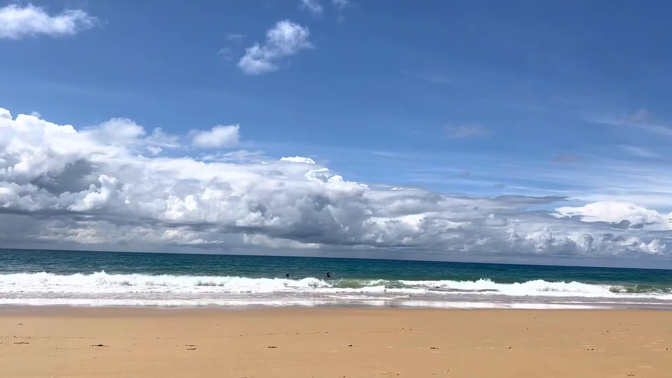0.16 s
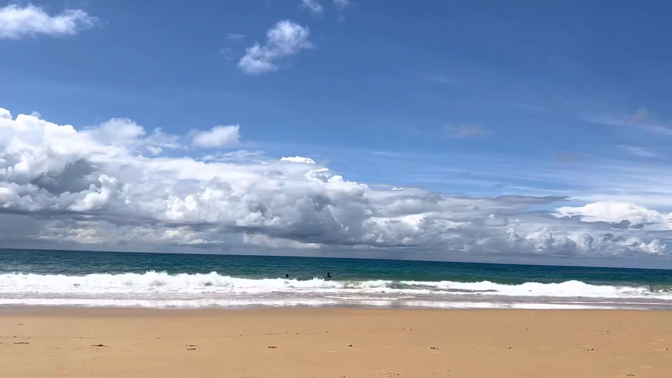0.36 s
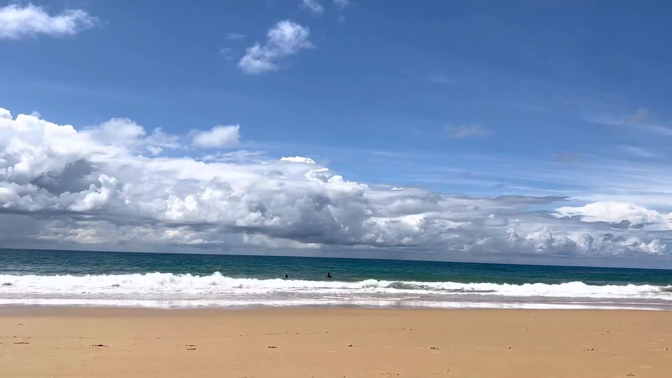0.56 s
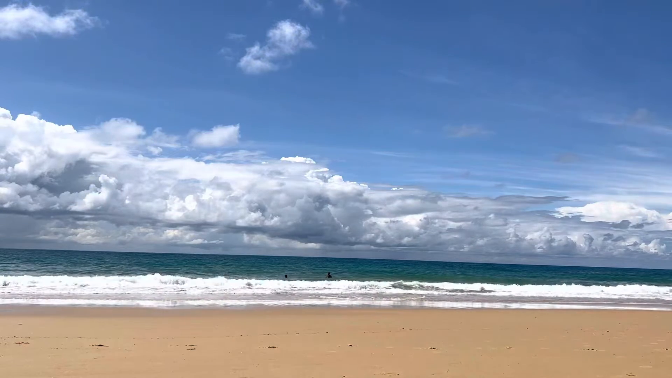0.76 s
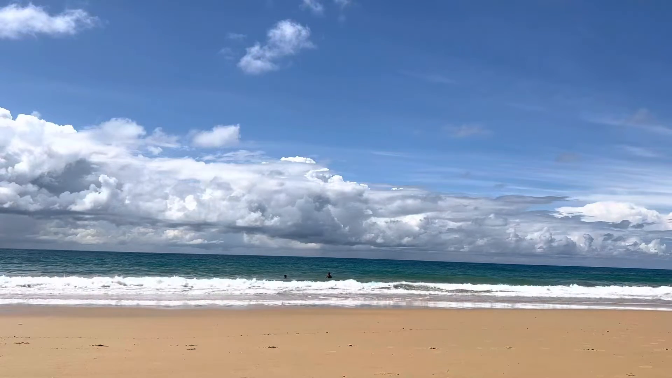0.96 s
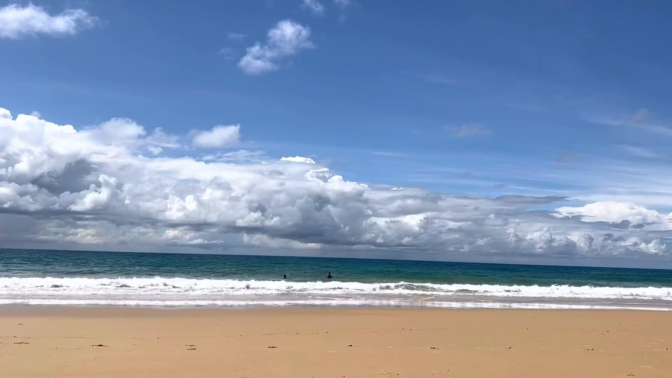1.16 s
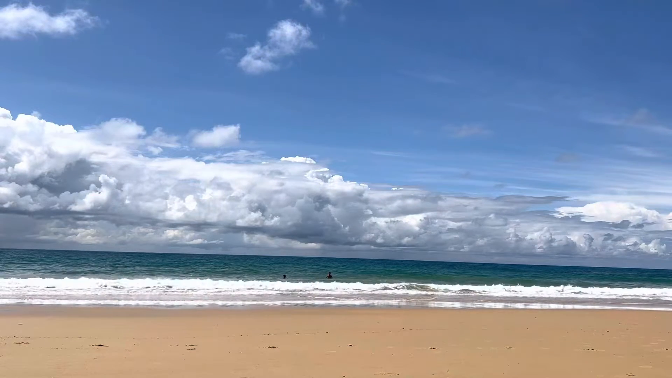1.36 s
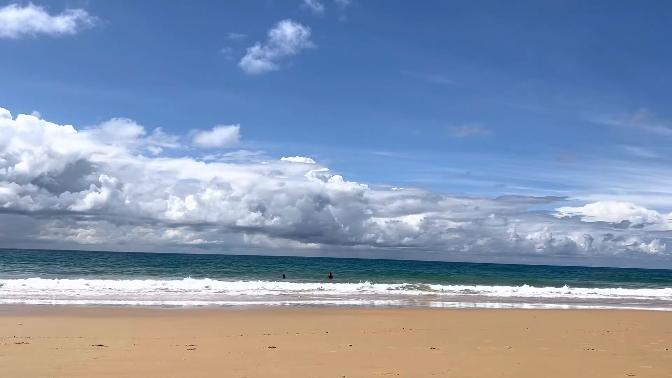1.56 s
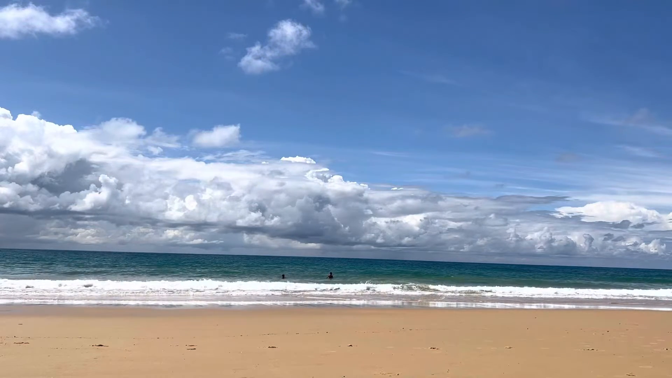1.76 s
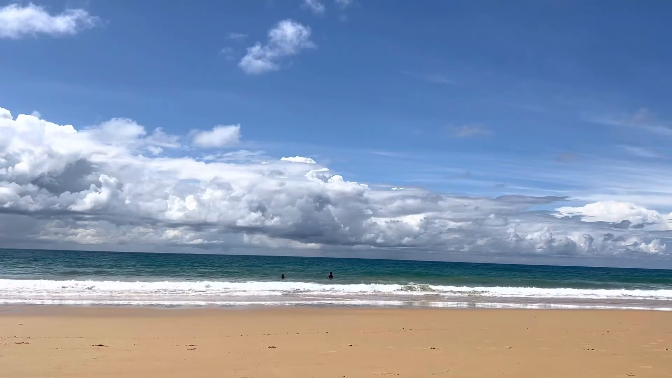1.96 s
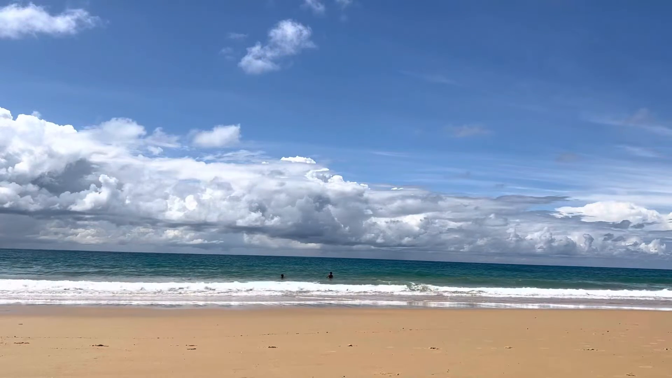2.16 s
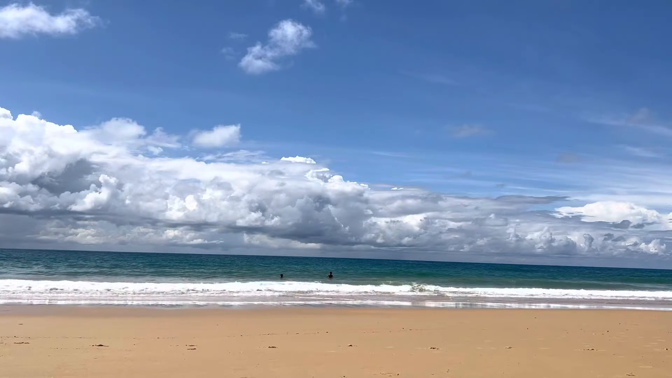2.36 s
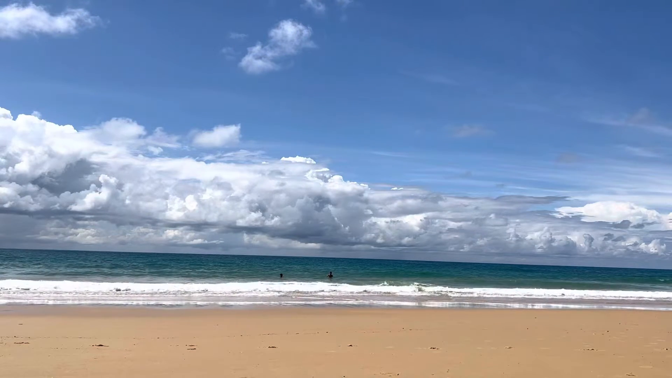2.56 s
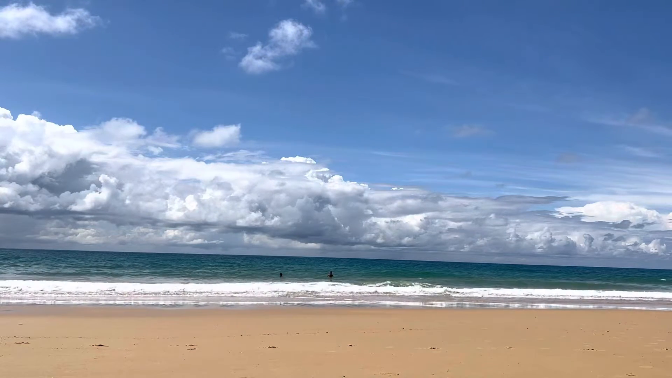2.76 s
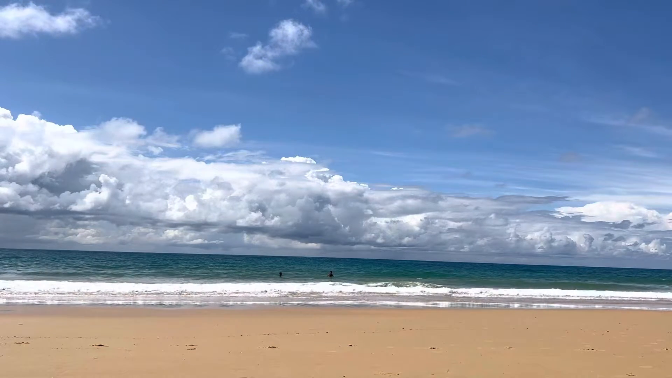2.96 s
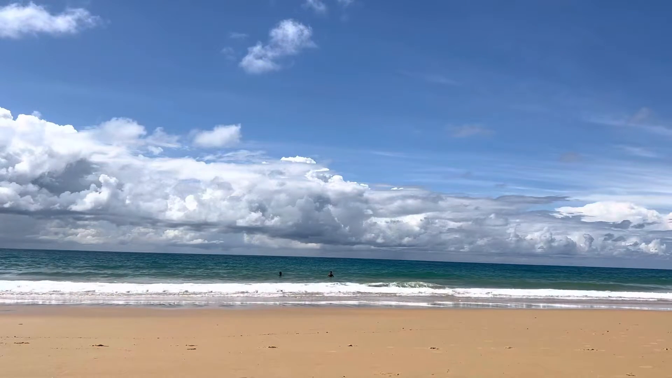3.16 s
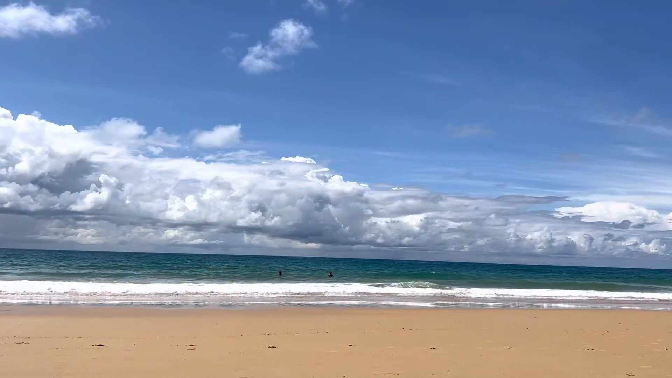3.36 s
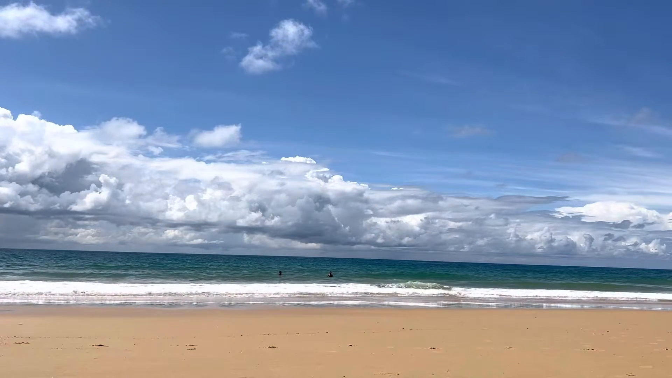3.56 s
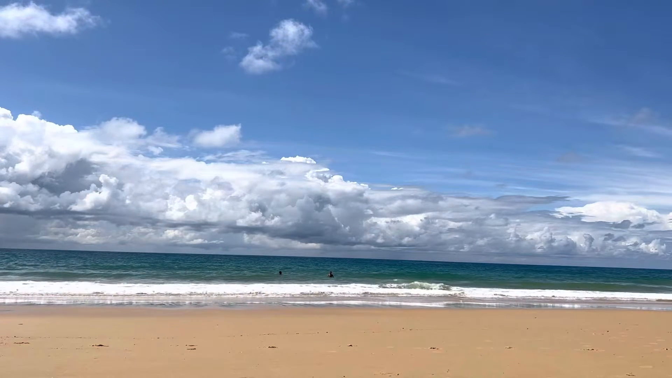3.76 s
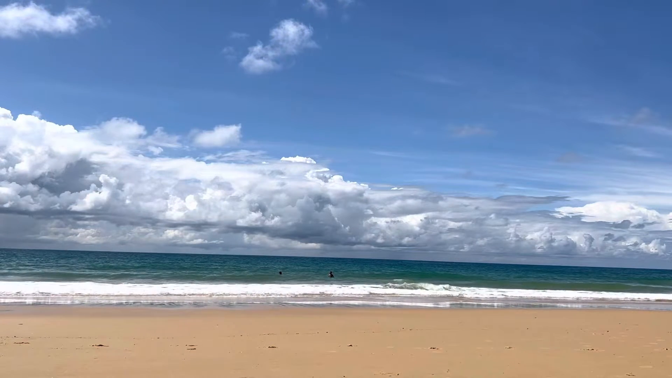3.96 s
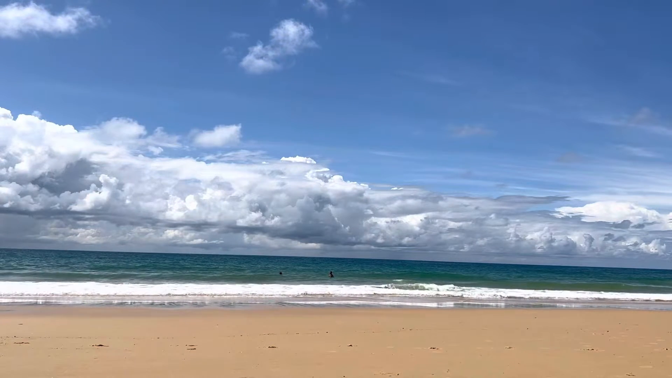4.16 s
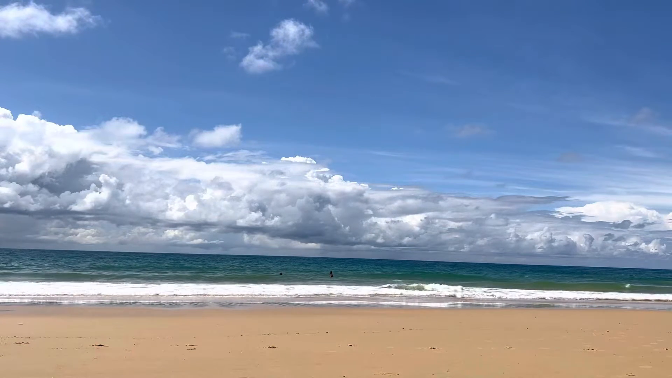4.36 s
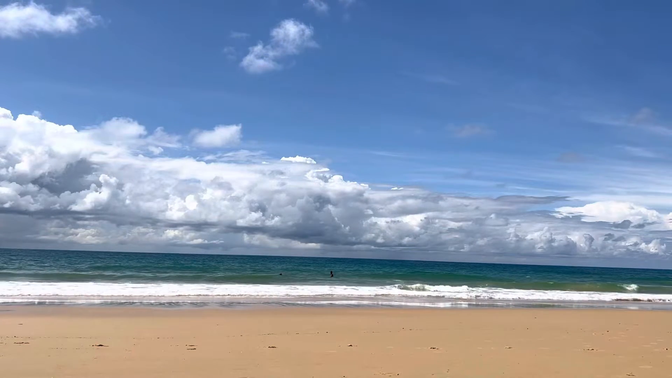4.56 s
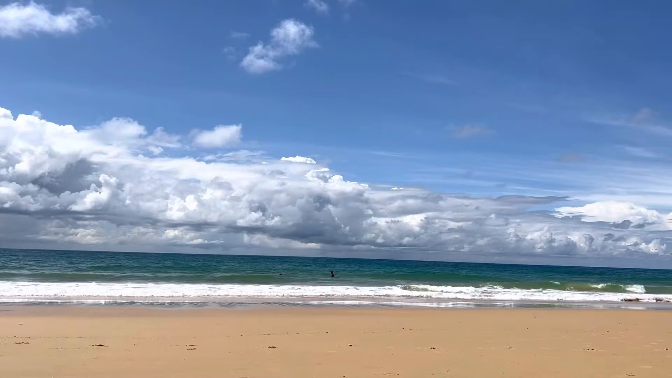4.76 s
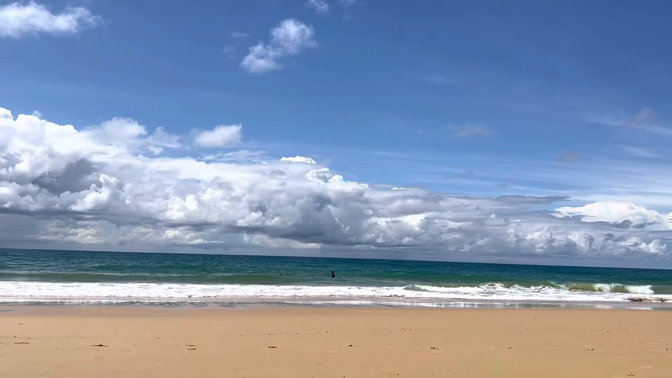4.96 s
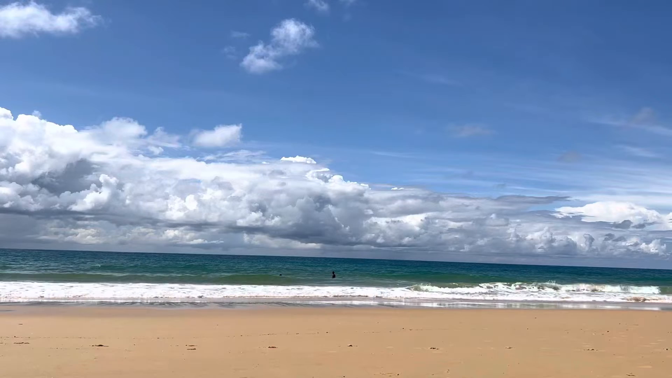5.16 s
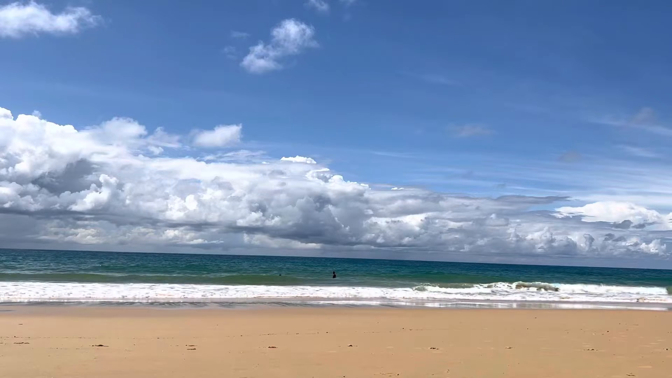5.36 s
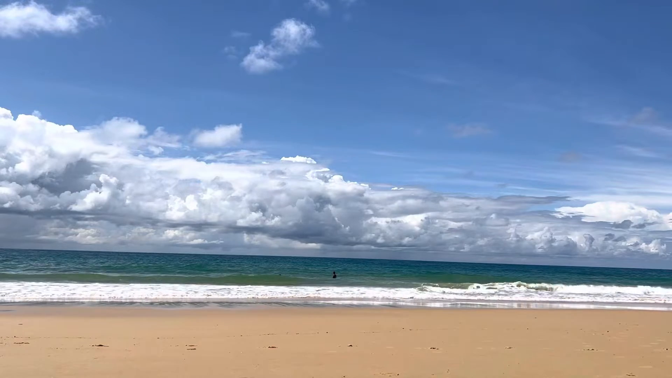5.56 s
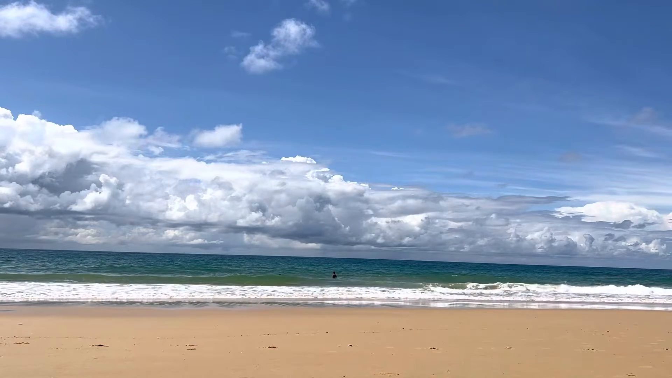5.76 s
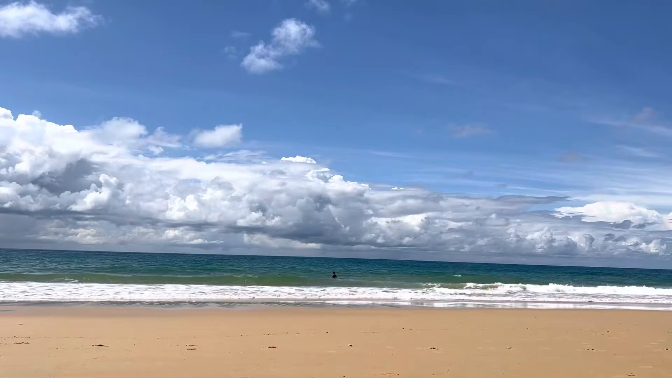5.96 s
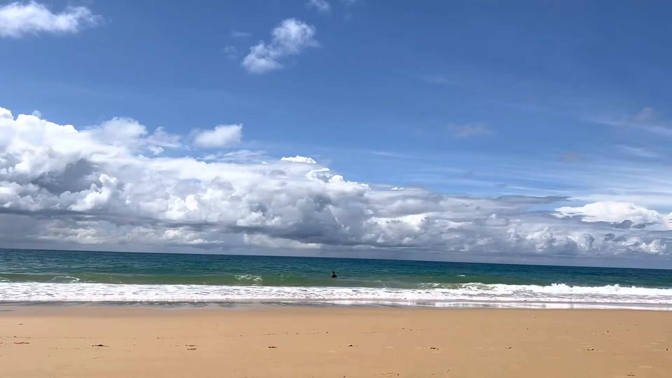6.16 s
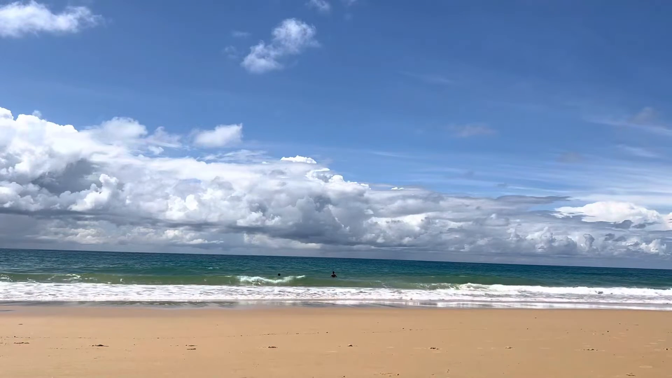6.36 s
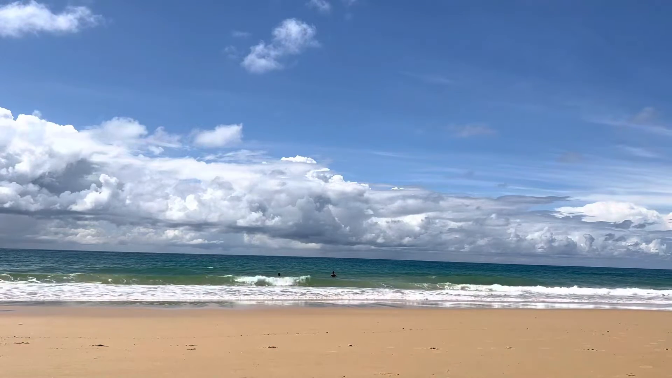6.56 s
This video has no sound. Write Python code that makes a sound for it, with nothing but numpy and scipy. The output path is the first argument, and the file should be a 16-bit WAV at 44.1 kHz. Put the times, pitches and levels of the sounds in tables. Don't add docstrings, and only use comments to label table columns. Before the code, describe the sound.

A breaker collapses with a soft low thud and fading roar on a sandy beach, then the surf lulls before another wave builds and plunges.

```python
import sys
import numpy as np
from scipy import signal
from scipy.fft import rfft, irfft, next_fast_len
from scipy.io import wavfile
from scipy.ndimage import uniform_filter1d

SR = 44100
rng = np.random.default_rng(int(sys.argv[2]) if len(sys.argv) > 2 else 0)


def ratio(d):
    e = np.asarray(d, float) / 20
    return 10 ** e


def file_out(sig):
    cols = np.atleast_2d(sig).T
    lim = np.clip(cols, -1, 1)
    pcm = np.round(lim * 32767).astype(np.int16)
    wavfile.write(sys.argv[1], SR, pcm)


N = 291501

BUBBLE_HZ = [80, 450, 2800, 8500]
# start in seconds, roar in dB, clouds of trapped air in dB.
PLUNGES = [(-0.05, -23.5, -27), (0.45, -36.5, -30.5), (1.08, -43, -36), (2.3, -44, -40), (3.0, -51, -42),
           (4.4, -40, -40), (4.7, -40.5, -58), (5.15, -34.5, -47), (5.35, -42, -39), (5.7, -39, -38),
           (6.3, -33.5, -36), (6.5, -29, -50)]
# start, rise and hold in seconds, wash in dB, fizz in dB.
FOAM_SHEETS = [
    (-0.3, 0.3, 0.27, -46.5, -57.5),
    (1.7, 0.31, 0.86, -54, -82),
    (4.2, 0.53, 0.34, -49.5, -63),
    (5.0, 0.32, 0.18, -59.5, -61.5),
    (6.153, 0.45, .5, -55, -61.5),
]
# level in dB of its clouds, roar, wash and fizz.
FAR_SURF_DB = [-39.5, -38.5, -44.5, -64]
# slow unevenness in dB of clouds, roar, wash and fizz.
LUMPS_DB = [.4, .9, .5, .2]
# time in seconds, share of the next wave from 0 to 1.
NEXT_WAVE = [
    (0, 0),
    (1.8, 0.47),
    (3.0, 0.5),
    (4.2, 0.95),
    (5.0, 0.96),
    (6.61, 1.0),
]
# time in seconds, pitch in Hz, peak in dB, length in seconds.
AIR_POCKETS = [
    (4.33, 47, -33, 0.027),
    (0.15, 57, -28, .04),
    (5.76, 59, -35, 0.025),
]
# pitch in Hz, level in dB per Hz.
COLOUR = [(25, -29), (55, -2), (130, 0.48), (400, -0.13), (800, -5), (1300, -14), (1600, -22),
          (2900, -26.5), (4000, -31.0), (5400, -30.5), (8500, -43), (10300, -50), (12200, -41.5),
          (15500, -51.5)]
# pitch in Hz, left minus right in dB for the first wave, then the next.
BODY_SHADE = [(60, 2.5, 4), (300, 2.3, 0), (504, 0.5, 1), (900, 0, -0.5), (1300, -0.7, -1), (1620, 0, -3),
              (2060, 0, -0.7), (2900, 5.5, 5.5), (4000, 7, 7), (5400, 14.5, 13.5), (7000, 8.5, 4.5),
              (8800, -0.5, 1)]
# pitch in Hz, part in step (-1 to 1),
# part a quarter cycle ahead (-1 to 1), then both parts again for the next wave.
SHARED_LOW = [(60, 0.99, 0.16, 0.95, 0.03), (204, 0.96, -0.36, 0.88, -0.17),
              (395, 0.89, -0.19, 0.58, -0.62), (600, 0.5, -0.64, -0.046, -0.02),
              (796, 0.12, -0.2, -0.13, -0.13), (980, 0.21, -0.37, 0.073, 0.67),
              (1300, 0.75, -0.1, 0.45, 0.55), (1500, 0.02, 0.65, -0.054, 0.27),
              (1990, 0.31, -0.13, 0.26, 0.14), (2580, 0.43, -0.24, 0.38, -0.42),
              (3000, 0.076, -0.25, 0.32, -0.31), (3600, 0.04, -0.044, 0.085, -0.08),
              (4600, 0.18, -0.29, 0.25, -0.31), (5300, 0.14, 0.06, 0.41, 0.05)]
# pitch in Hz, part in step (-1 to 1), part a quarter cycle ahead (-1 to 1).
SHARED_TOP = [(5900, -.06, .06), (6500, 0.049, -.13), (7200, 0.31, .12), (8000, 0.29, .46),
              (8600, -0.079, .5), (9070, -0.66, .1), (9700, -.95, 0), (10700, -0.9, 0),
              (11500, -0.37, -.55), (11950, .32, -.66), (12500, 0.99, -.13), (13600, 1, .03),
              (14100, 0.83, .1), (15400, -.45, 0)]

SURF_DB = -29
POPS_PER_S, POP_SCATTER_DB, SMEAR_S = 30000, 3, 0.02
CLOUD_RISE_S, CLOUD_FADE_DB_S = 0.046, 9.5
ROAR_RISE_S, ROAR_FADE_DB_S = 0.15, 4
WASH_FADE_DB_S, FIZZ_FADE_DB_S = 21, 8
DRAIN_DB_S = 0.4
LUMPS_PER_S = 7
NOTCH_HZ, NOTCH_WIDTH_HZ, NOTCH_DEPTH = 5480, 70, 0.5
TOP_HZ, OPEN_S = 15300, 0.004


def surf():
    size = next_fast_len(N)
    hz, spectra = ports(size)
    swell = waves()
    swell = swell - 10 * np.log10(np.mean(ratio(swell) ** 2, axis=1, keepdims=True))
    surge = walk(12)
    out = 0
    centres = np.arange(4, 14.6, 0.5)
    octaves = np.clip(np.log2(hz), centres[0], centres[-1])
    for centre in centres:
        share = np.clip(1 - 2 * np.abs(octaves - centre), 0, 1)
        place = np.interp(centre, np.log2(BUBBLE_HZ), np.arange(4))
        mix = np.clip(1 - np.abs(place - np.arange(4)), 0, 1)
        flicker_db = np.interp(place, [0, 2, 3], [0.9, 0.4, 0.6])
        lumps_db = np.interp(place, np.arange(4), LUMPS_DB)
        db = mix @ swell + 0.3 * surge
        db = db + flicker_db * walk(16) + lumps_db * walk(LUMPS_PER_S)
        out = out + ratio(db) * irfft(spectra * share, size)[:, :N]
    time = np.arange(N) / SR
    moved = np.clip(np.interp(time, *np.transpose(NEXT_WAVE)), 0, 1)
    left, right_first, right_next = out
    both = np.array([left, (1 - moved) * right_first + moved * right_next])
    return both * ratio(SURF_DB) / np.sqrt(np.mean(both.mean(axis=0) ** 2))


def waves():
    far = ratio(np.array(FAR_SURF_DB)) ** 2
    clouds = sum(burst(s, CLOUD_RISE_S, 0, db, CLOUD_FADE_DB_S) for s, _, db in PLUNGES)
    roar = sum(burst(s, ROAR_RISE_S, 0, db, ROAR_FADE_DB_S) for s, db, _ in PLUNGES)
    wash = sum(burst(s, rise, hold, db, WASH_FADE_DB_S) for s, rise, hold, db, _ in FOAM_SHEETS)
    fizz = sum(burst(s, rise, hold, db, FIZZ_FADE_DB_S) for s, rise, hold, _, db in FOAM_SHEETS)
    drain = ratio(-DRAIN_DB_S * np.arange(N) / SR) ** 2
    return 10 * np.log10([clouds + far[0], roar + far[1], wash + far[2] * drain, fizz + far[3]])


def burst(start, rise, hold, db, fade):
    since = np.arange(N) / SR - start
    up = np.sin(np.pi / 2 * np.clip(since / rise, 0, 1)) ** 2
    return up * ratio(db - fade * np.maximum(since - rise - hold, 0)) ** 2


def ports(size):
    hz = np.maximum(np.arange(size // 2 + 1) * SR / size, 1)
    left, other = pops(size), pops(size)
    heard = [left]
    for wave in range(2):
        low = [row[:1] + row[1 + 2 * wave:3 + 2 * wave] for row in SHARED_LOW]
        table = low + SHARED_TOP
        shared = along(hz, table, axis=1) + 1j * along(hz, table, axis=2)
        shared = shared / np.maximum(np.abs(shared), 1)
        own = np.sqrt(np.maximum(1 - np.abs(shared) ** 2, 0))
        right = shared * left + own * other
        heard.append(right * ratio(-along(hz, BODY_SHADE, axis=1 + wave)))
    return hz, np.array(heard) * ratio(along(hz, COLOUR))


def pops(size):
    when, sign = rng.random((2, size))
    strength = ratio(POP_SCATTER_DB * rng.standard_normal(size))
    train = (when < POPS_PER_S / SR) * np.sign(sign - 0.5) * strength
    tail = rng.standard_normal(8192) * np.exp(-np.arange(8192) / (SMEAR_S * SR))
    paths = rfft(tail, size)
    return rfft(train) * paths / np.abs(paths)


def along(hz, table, axis=1):
    rows = np.array(table)
    return np.interp(np.log(hz), np.log(rows[:, 0]), rows[:, axis])


def walk(rate):
    hold = int(SR / rate)
    steps = np.repeat(rng.standard_normal(N // hold + 1), hold)
    return 1.3 * uniform_filter1d(uniform_filter1d(steps, hold), hold)[:N]


def thuds():
    time = np.arange(N) / SR
    out = 0
    for start, hz, db, width in AIR_POCKETS:
        since = time - start
        bump = np.exp(-0.5 * (since / width) ** 2)
        out = out + ratio(db) * bump * np.sin(2 * np.pi * hz * since)
    return out


def scene():
    return surf() + thuds()


def low_pass(x):
    return signal.sosfilt(signal.butter(12, 15300, fs=SR, output="sos"), x)


def record(dry):
    edge = np.minimum(np.arange(N), np.arange(N)[::-1]) / (OPEN_S * SR)
    opened = dry * np.sin(np.pi / 2 * np.minimum(edge, 1)) ** 2
    b, a = signal.iirpeak(NOTCH_HZ, NOTCH_HZ / NOTCH_WIDTH_HZ, fs=SR)
    dipped = opened - NOTCH_DEPTH * signal.lfilter(b, a, opened)
    top_cut = signal.ellip(10, 0.2, 70, TOP_HZ, fs=SR, output="sos")
    return low_pass(signal.sosfilt(top_cut, dipped))


dry = scene()
out = record(dry)
file_out(out)
```